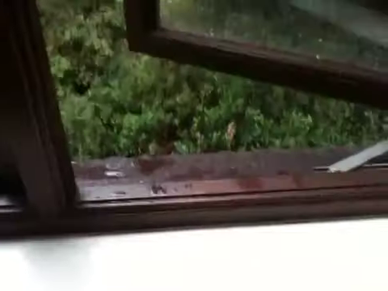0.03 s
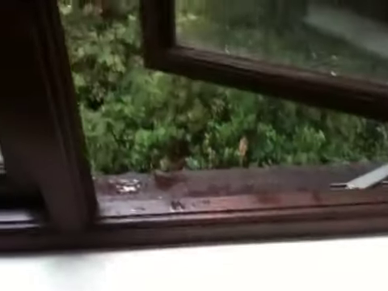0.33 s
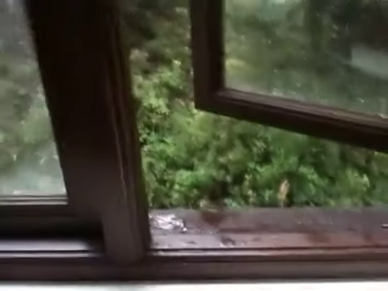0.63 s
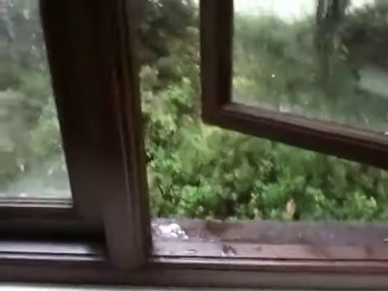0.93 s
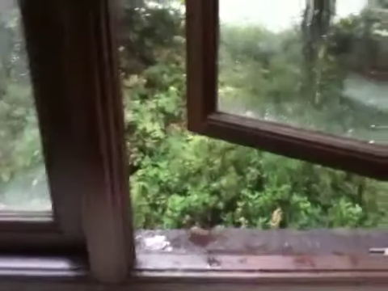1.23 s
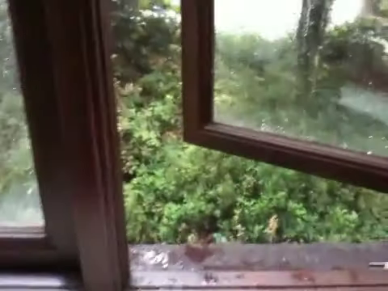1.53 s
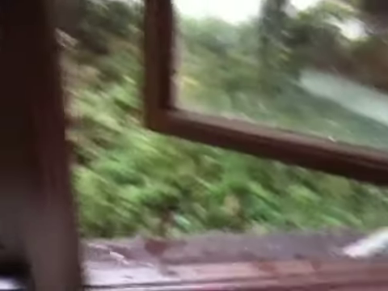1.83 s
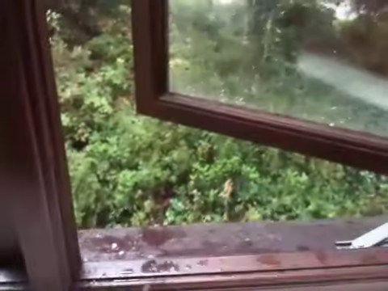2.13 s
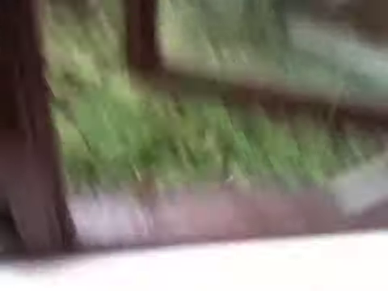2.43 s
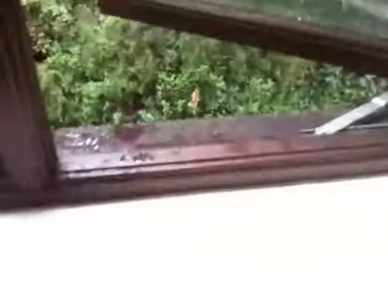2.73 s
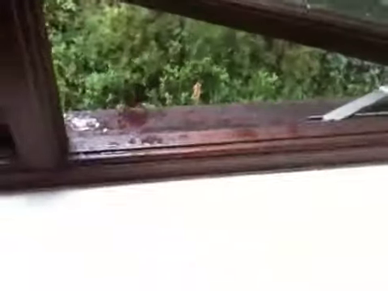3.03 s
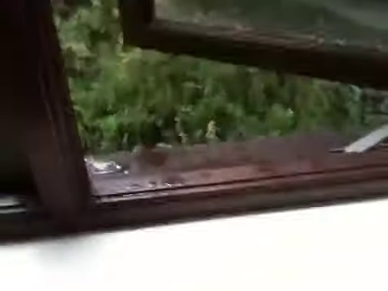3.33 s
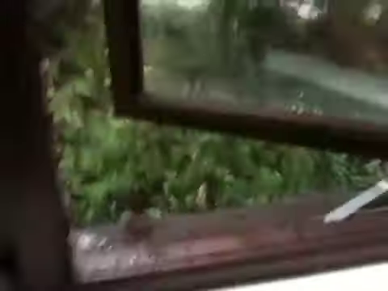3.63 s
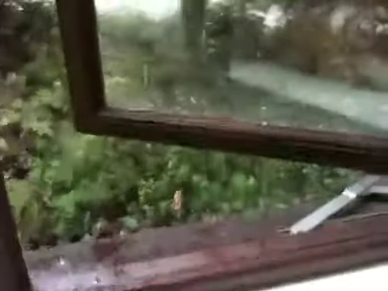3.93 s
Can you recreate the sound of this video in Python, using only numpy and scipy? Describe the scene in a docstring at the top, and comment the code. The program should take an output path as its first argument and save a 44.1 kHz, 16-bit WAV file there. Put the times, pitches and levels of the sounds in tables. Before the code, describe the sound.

Hailstones click and shatter on a wooden sill, frame and pane, close to a microphone at an open window. The hail thins briefly, then thickens again, while rain hisses steadily in the garden shrubs beyond.

```python
"""Hail at an open window

One mono microphone at an open window, facing garden shrubs in hail and rain. Close up, hailstones click
or shatter on the sill, frame and pane and echo briefly in the recess; smaller ones patter between them.
Farther off, the rain hisses in the leaves. The hail thins out in the middle and then thickens."""
import sys
import numpy as np
from scipy import signal
from scipy.fft import rfft, irfft, next_fast_len
from scipy.io import wavfile
from scipy.ndimage import map_coordinates

SR = 44100
rng = np.random.default_rng(int(sys.argv[2]) if len(sys.argv) > 2 else 0)


def dump(signal):
    """Clip the signal to [-1, 1] and save it as 16-bit WAV at the path in sys.argv[1]."""
    limited = np.clip(np.atleast_2d(signal).T, -1, 1)
    pcm = np.round(limited * 32767).astype(np.int16)
    wavfile.write(sys.argv[1], SR, pcm)


N = 176400


def near_hail(lift_db=3):
    """Single stones strike right by the microphone."""
    # strikes: start_s, level_db (before the lift), knock_db, crack_db, pitch_hz, ping_db, shatter_share
    stones = [(.0015,-25.5,-17.5,0,9000,8,0.4),(0.0571,-31.5,-9.5,0,9050,7,0.97),(.074,-31.5,-13,6,7900,14,.5),(.1321,-29,-19,-1,6800,8,0.2),(.1562,-31.5,-14,-3,8000,11,0.5),(.224,-28,-17,-12,6300,4,0.44),(.251,-32,-12.5,4,5230,11,.2),(0.2559,-24.5,-15.5,-2,10900,4,0.14),(0.2878,-35,-8,-5,7250,6,0),(.322,-36,-25,2,10700,6,0.2),(.4038,-27,-19,-5,8700,5,.5),(0.5091,-28.5,-10.5,-15,7350,7,0.17),(0.567,-30,-13,-2,6300,10,0.2),(.645,-36,-8,-9,9500,7,0.4),(.7323,-37.5,-12,-11,6160,7,.5),
              (1.0659,-32,-21,-4,8000,4.5,0.55),(1.152,-27,-11,0.5,5900,13.5,.3),(1.169,-36.5,-10,-18,6030,11,0.8),(1.2655,-34.5,-34,-19,3900,2,0.1),(1.3315,-36,-9,-8,9650,2,0.8),
              (2.0142,-23.5,-20,5,5930,24,0),(2.0384,-23,-22,-2.5,9500,8,0.16),(2.0664,-30.5,-10.5,-7,4960,7,0.8),(2.2194,-22,-23,-7,6700,5,0.09),(2.3318,-30,-10.5,2,8760,9,0.15),(2.3784,-34,-24,0,8230,10,0.3),(2.4105,-34,-25,-8,8870,10,0.3),(2.512,-32.5,-11,-4,6490,4,0.82),(2.5803,-30.5,-22,-6,7960,11,0),(2.672,-31,-13,-2,7370,2,0.8),(2.747,-34.5,-20,-4,6440,8,1),(2.8102,-35.5,-7,-14,6580,4,.9),(2.891,-35.5,-12,-1,8610,6,0.8),(2.9237,-31,-23,4,7000,9,0.75),(2.954,-30.5,-23,-5,6660,4,.2),
              (3.0005,-28.5,-22,-10,8000,1,0.2),(3.028,-28,-28,-2,7000,2,0.34),(3.0516,-36,-21,3,9600,15,0.2),(3.066,-29.5,-28,-9,6700,2,.3),(3.1025,-30,-27,2,10200,1,0.6),(3.157,-34.5,-24,-2,7750,4,0.74),(3.1964,-29,-15,2,7700,10,0.6),(3.264,-28.5,-16,3,7400,7,0),(3.298,-35.5,-16,-17.5,3920,5.5,1),(3.3935,-34.5,-20,-1,8180,1,.8),(3.408,-29.5,-17,-8,6320,0,0.54),(3.438,-29.5,-12,-3,7640,1,.7),(3.454,-32,-5.5,-9,3510,0,.9),(3.4781,-19,-15.5,5.5,9000,10,0.46),(3.48,-20,-16.5,7,8360,11,0),
              (3.509,-29,-26,-5,9430,8,0.4),(3.5257,-32.5,-16,-7,6450,-1,0.98),(3.5549,-29,-15,-6,6100,5,0.26),(3.577,-28.5,-15,0,9000,11,0.86),(3.631,-32,-12,-6,6830,-3,0.8),(3.643,-33.5,-20,-2,10480,6,0.7),(3.6771,-25,-18,1,8720,4,0.14),(3.6842,-22,-12.5,1,7040,9,0.7),(3.7064,-21.5,-15,-7,8060,-5,0),(3.715,-29,-26,-13,8140,1,0.5),(3.719,-22.5,-19.5,-1,6700,4,0.3),(3.778,-29,-21,-12,6200,1,0.44),(3.7998,-31.5,-18,-12,5560,5,1),(3.837,-27.5,-16,-19,4950,4,0.85),(3.8744,-35,-16,-26,5200,13,1),(3.9396,-35,-9,-25,3494,6,0.8),(3.965,-25.5,-24,-18,7400,5,0.6),(3.99,-33.5,-8,-17,5170,10,0.74)]
    out = np.zeros(N)
    for start_s, level_db, *character in stones:
        add(out, start_s, amp(level_db + lift_db) * hailstone(*character))
    return out


def hailstone(knock_db, crack_db, pitch_hz, ping_db, shatter):
    """The contact, coloured by the stone (thin and bright if it stays whole), over a knock of the frame."""
    # tone of a hailstone: frequency_hz, gain_db
    stone_tone = [(100, -38), (1500, -30), (2700, -20), (3400, 3), (4500, -3.5), (6800, -1), (10500, 0),
                  (15500, -9)]
    blow = contact(shatter)
    hz = np.fft.rfftfreq(len(blow), 1 / SR)
    ring_db = ping_db * resonance(hz, pitch_hz, width_octaves=0.12)
    treble_db = crack_db * np.interp(hz, [7900, 12100], [0, 1])
    # a stone radiates little below its edge, which is lower if it shatters or has a low pitch
    edge_hz = min(np.interp(shatter, [0, 1], [5140, 3540]), 0.82 * pitch_hz)
    skirt_db = np.interp(hz / edge_hz, [0.5, 1], [-20, 0])
    colour = minimum_phase(along(stone_tone, hz) + ring_db + treble_db + skirt_db)
    snap = struck(rfft(blow) * colour)
    return snap + amp(knock_db) * frame_knock(hz, shatter)


def contact(shatter):
    """A whole stone gives one tight click, a shattering one a spray of splinters that echoes more."""
    touch, splinters = burst(t60_s=0.0042), burst(t60_s=0.018)
    recess = burst(t60_s=0.041, delay_s=0.003)  # echoes off the window recess
    touch[0] += 1  # the first hard touch
    t = np.arange(len(splinters)) / SR
    splinters *= 1 - np.exp(-t / 0.0012)
    splinters /= np.linalg.norm(splinters)
    blow = np.sqrt((1 - shatter) / 2) * touch + np.sqrt(shatter) * splinters
    pane_delay_s = 0.0041 * (0.5 + rng.random())
    pane = np.roll(blow, round(pane_delay_s * SR))  # one clear reflection off the open pane
    return blow + amp(-8.5) * pane + amp(-9.5) * (1 + shatter) / 2 * recess


def frame_knock(hz, shatter):
    """The wooden frame and sill ring briefly in their modes under the blow."""
    # modes of the wood: pitch_hz, width_hz, gain_db
    modes = [(273, 140, -2.5), (487, 100, 1), (785, 230, -1.5), (1150, 200, -0.5), (1450, 240, 3),
             (2804, 570, 6.5)]
    wood = 0
    for k, (pitch_hz, width_hz, gain_db) in enumerate(modes):
        damping = 1j * hz * width_hz
        wood += (-1) ** k * amp(gain_db) * damping / (pitch_hz ** 2 - hz ** 2 + damping)
    push = burst(t60_s=0.046)  # the frame's shudder
    push[0] += 1 - shatter  # the blow itself
    return struck(rfft(push) * wood)


def patter(typical_hz=6140, scatter_octaves=0.3, scatter_db=1):
    """Small stones land at random and shatter, more often as the shower thickens."""
    # fall of small stones: time_s, stones_per_s, level_db
    fall = [(0, 63, -43), (.6, 42.5, -39.5), (1.3, 32.2, -36), (1.42, 10.8, -48), (1.95, 13.8, -43),
            (2.3, 42.7, -40), (2.9, 65, -36.5), (3.3, 50.5, -46), (3.55, 121, -43), (4, 77, -48)]
    stones_per_s, level_db = curves(fall)
    stones_due = np.cumsum(stones_per_s) / SR
    out = np.zeros(N)
    for k, (jitter, softness, detune) in enumerate(rng.standard_normal((400, 3))):
        i = np.searchsorted(stones_due, k + jitter)
        if 0 < i < N:
            pitch_hz = typical_hz * 2 ** (scatter_octaves * detune)
            stone = hailstone(knock_db=-11, crack_db=6.5, pitch_hz=pitch_hz, ping_db=15, shatter=0.91)
            add(out, i / SR, amp(level_db[i] - scatter_db * softness) * stone)
    return out


def rain(trim_db=-0.5):
    """Out in the garden: a low wash, drops on leaves and a fizz of fine spray."""
    # course of the rain: time_s, wash_db, leaves_db, fizz_db (the last two before the trim)
    levels = [(0, -48.5, -42, -38.5), (.28, -50.5, -41.5, -40), (.89, -50.5, -43, -39.5),
              (1.46, -51, -42.5, -41), (1.98, -50.5, -42, -40.5), (3.0, -50, -39.5, -39),
              (3.61, -50, -39.5, -36), (4, -51.5, -38.5, -38)]
    # spectra of the three layers: frequency_hz, relative_density_db
    wash_tone = [(25, -17), (70, -15.5), (95, -13), (130, -5.5), (195, 2), (260, 0.5), (400, -2),
                 (590, -2.5), (780, 1.5), (1100, 0.5), (1400, -5), (2200, -45)]
    leaves_tone = [(200, -72), (700, -12.5), (1250, -10.5), (1600, -.5), (2100, -2.5), (2750, -2),
                   (3400, -.5), (4500, -1.5), (5500, -9), (8000, -14.5)]
    fizz_tone = [(1000, -70), (3200, -23), (4800, -4.5), (6200, 1), (7600, 0.5), (9500, -3), (11500, -9),
                 (13000, -16.5), (15600, -22.5)]
    wash_db, leaves_db, fizz_db = curves(levels)
    wash = amp(wash_db) * shower(wash_tone, drop_db=-6, flutter_db=0.25)
    leaves = amp(leaves_db) * shower(leaves_tone, drop_db=-3.5, flutter_db=0.75)
    fizz = amp(fizz_db) * shower(fizz_tone, drop_db=-3.5, flutter_db=0.56)
    return wash + amp(trim_db) * (leaves + fizz)


def shower(spectrum, drop_db, flutter_db, drops_per_s=2200, spread_db=3):
    """Countless far drops merge to noise; nearer ones of uneven size add grain."""
    landings = (rng.random(N) < drops_per_s / SR) * rng.choice([-1, 1], N)
    near_drops = landings * amp(spread_db * rng.standard_normal(N))
    drops = rng.standard_normal(N) + amp(drop_db) * unit(near_drops)
    hiss = unit(filtered(drops, lambda hz: amp(along(spectrum, hz))))
    return hiss * amp(flutter_db * wobble(knots_per_s=14))


def window_gap(x, lift_db=2.5):
    """The opening lifts one narrow band of the sound that comes through it."""
    # resonance of the gap, which shifts as the microphone moves: time_s, pitch_hz
    gap = [(0, 3780), (.6, 3440), (1.3, 3620), (1.85, 3200), (2.15, 3700), (2.7, 3400), (2.9, 4030),
           (3.4, 3850), (3.6, 4534)]
    hz, t, spectra = signal.stft(x, SR, nperseg=1024)
    pitch_hz = np.interp(t, *np.transpose(gap))
    gain_db = lift_db * resonance(hz[:, None], pitch_hz, width_octaves=0.099)
    return signal.istft(spectra * amp(gain_db), SR)[1][:N]


def amp(db):
    return 10 ** (np.asarray(db) / 20)


def unit(x):
    return x / np.sqrt(np.mean(x ** 2) + 1e-20)


def resonance(hz, pitch_hz, width_octaves):
    """A peak of height 1 that falls to half at width_octaves either side."""
    return 1 / (1 + (np.log2((hz + 1) / pitch_hz) / width_octaves) ** 2)


def along(points, hz):
    """Interpolate (frequency_hz, value) points on a log axis."""
    knots_hz, values = np.transpose(points)
    return np.interp(np.log(hz + 1), np.log(knots_hz + 1), values)


def curves(rows):
    """One value per sample for each column after the time."""
    time_s, *columns = np.transpose(rows)
    return [np.interp(np.arange(N) / SR, time_s, column) for column in columns]


def wobble(knots_per_s):
    """A smooth random curve."""
    knots = rng.standard_normal(int(N * knots_per_s / SR) + 4)
    return map_coordinates(knots, [np.arange(N) * knots_per_s / SR])


def filtered(x, response):
    """Shape x by a gain that depends on frequency."""
    size = next_fast_len(N + SR // 2)
    return irfft(rfft(x, size) * response(np.fft.rfftfreq(size, 1 / SR)), size)[:N]


def minimum_phase(gain_db):
    """The response with this gain that rings only after the blow."""
    cepstrum = irfft(np.log(amp(gain_db)))
    half = len(cepstrum) // 2
    cepstrum[1:half] *= 2
    cepstrum[half + 1:] = 0
    return np.exp(rfft(cepstrum))


def burst(t60_s, delay_s=0, size=4096):
    """Dying noise of energy 1."""
    t = np.arange(size) / SR
    x = rng.standard_normal(size) * 1e-3 ** (t / t60_s) * (t >= delay_s)
    return x / np.linalg.norm(x)


def struck(spectrum):
    """A blow's waveform with rms 1 over its first 5 ms."""
    x = irfft(spectrum)
    return x / np.sqrt(np.mean(x[:SR // 200] ** 2))


def add(track, start_s, sound):
    """Mix a sound into the track."""
    i = int(np.clip(round(start_s * SR), 0, N - 1))
    track[i:i + len(sound)] += sound[:N - i]


def scene():
    """Rain beyond the window, hail close by, and the hail's faint echo from the room behind."""
    garden = window_gap(rain())
    room = burst(t60_s=0.13, delay_s=0.0047, size=16384)
    hail = near_hail() + patter()
    mono = garden + hail + amp(-28) * signal.fftconvolve(hail, room)[:N]
    return np.array([mono, mono])


def record(dry):
    """The recorder rounds off the hardest peaks and keeps nothing above its band limit."""
    ceiling, hardness, top_hz = 0.68, 4, 15900
    rounded = dry / (1 + np.abs(dry / ceiling) ** hardness) ** (1 / hardness)
    return np.array([filtered(channel, lambda hz: hz < top_hz) for channel in rounded])


dry = scene()
out = record(dry)
dump(out)
```